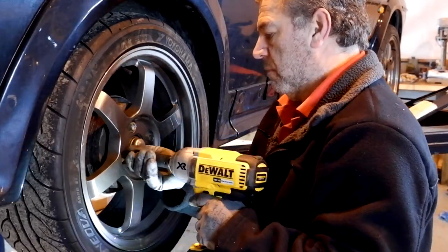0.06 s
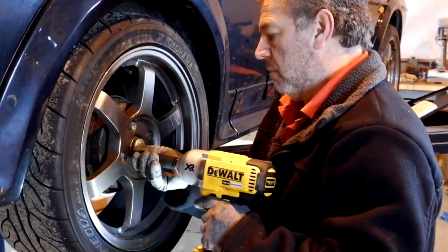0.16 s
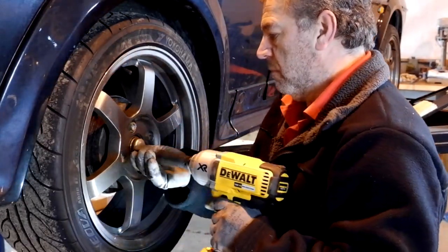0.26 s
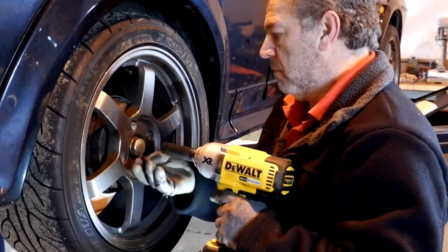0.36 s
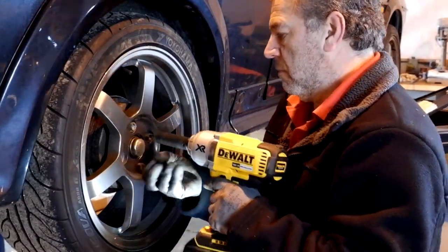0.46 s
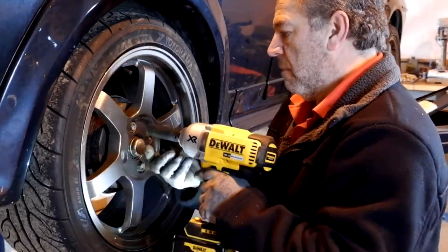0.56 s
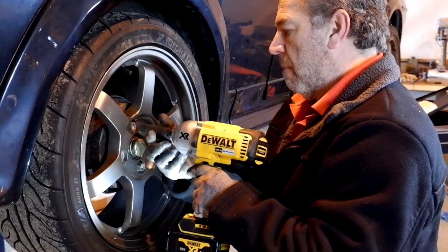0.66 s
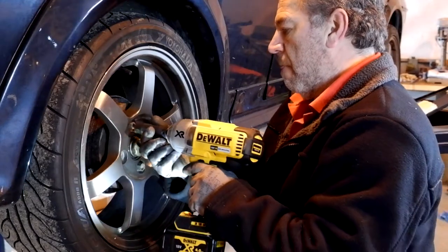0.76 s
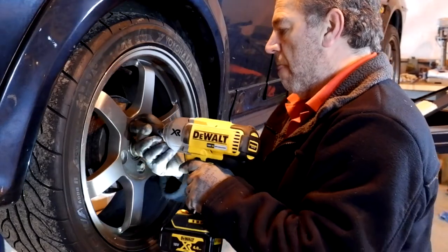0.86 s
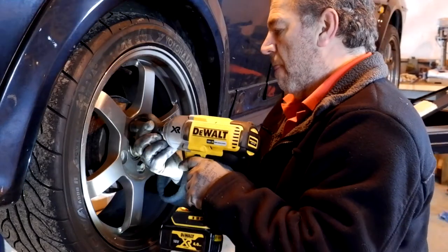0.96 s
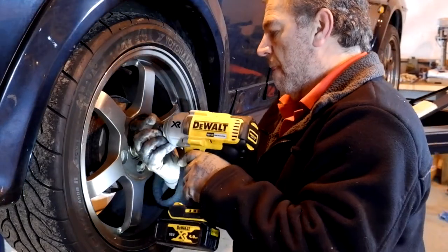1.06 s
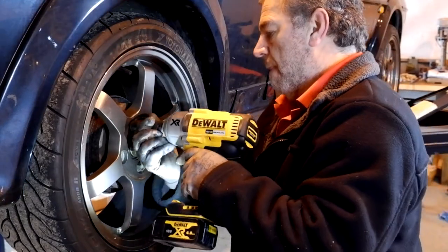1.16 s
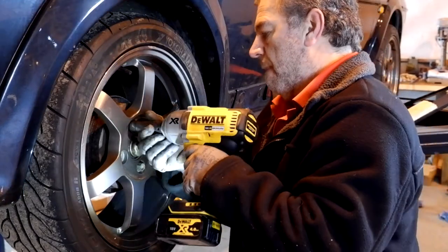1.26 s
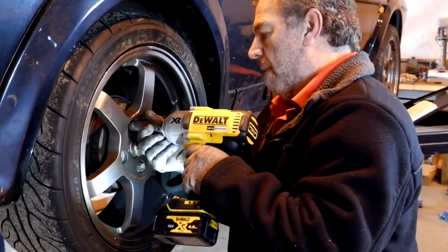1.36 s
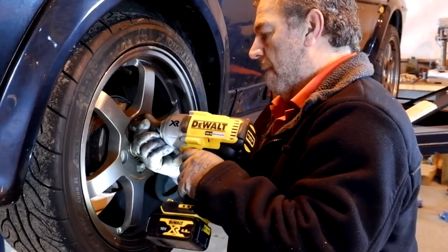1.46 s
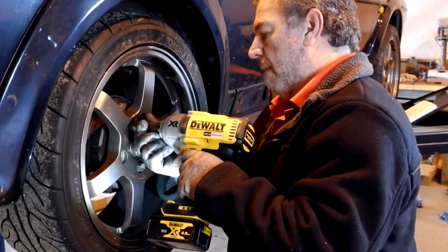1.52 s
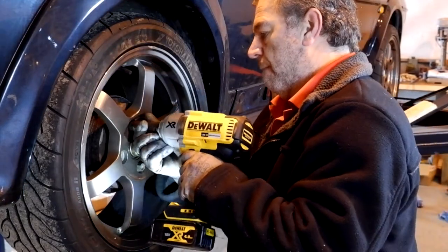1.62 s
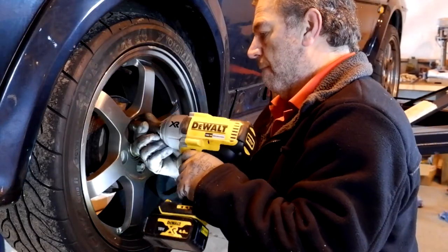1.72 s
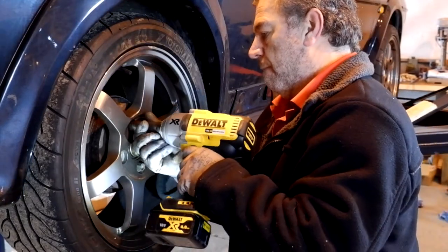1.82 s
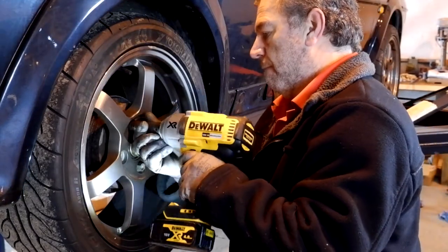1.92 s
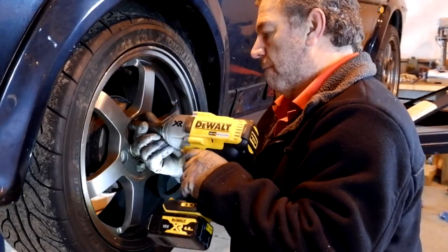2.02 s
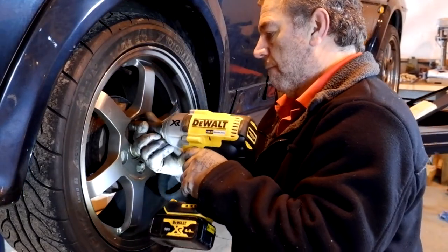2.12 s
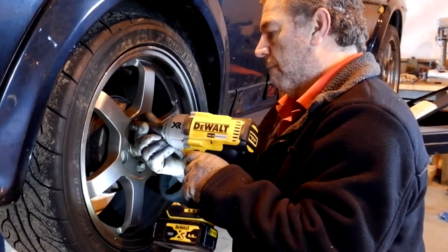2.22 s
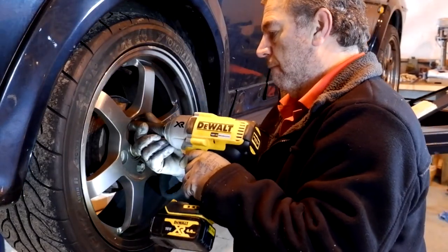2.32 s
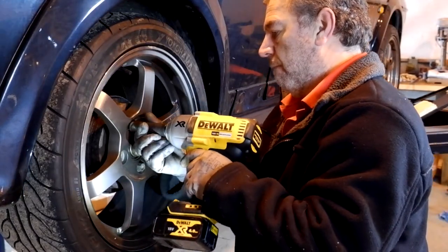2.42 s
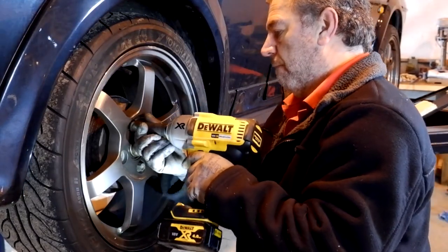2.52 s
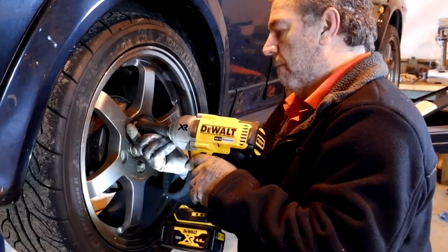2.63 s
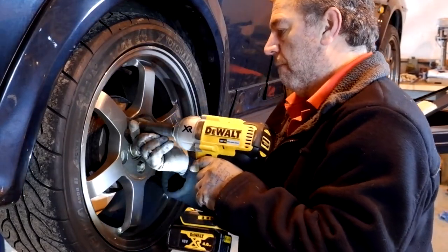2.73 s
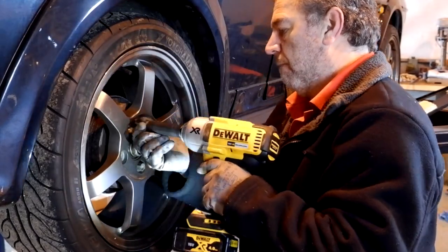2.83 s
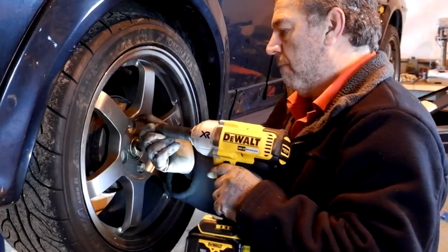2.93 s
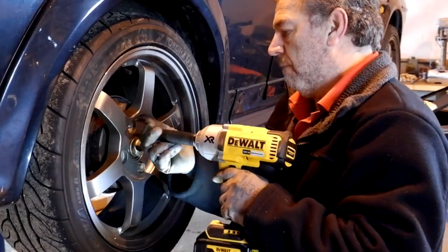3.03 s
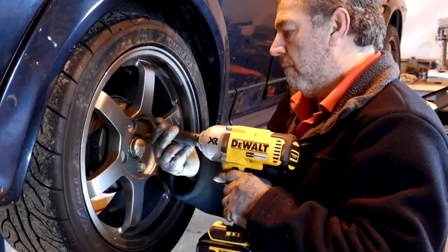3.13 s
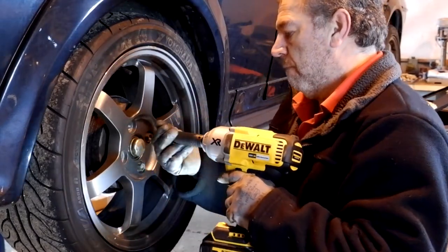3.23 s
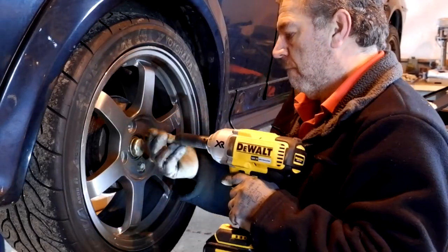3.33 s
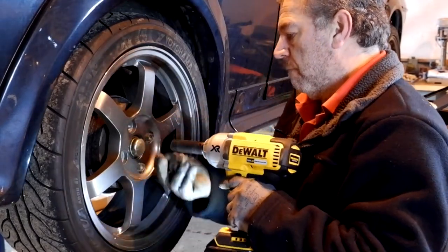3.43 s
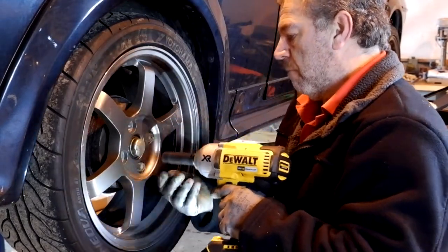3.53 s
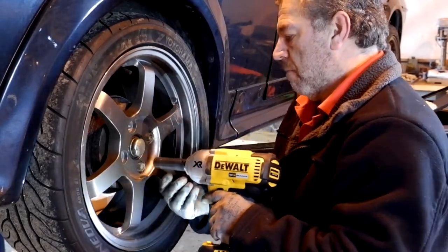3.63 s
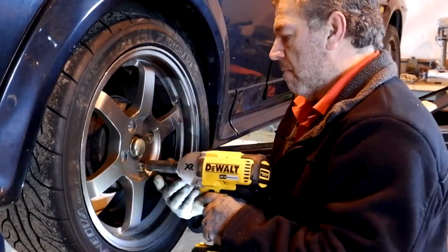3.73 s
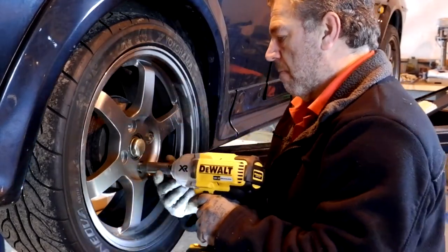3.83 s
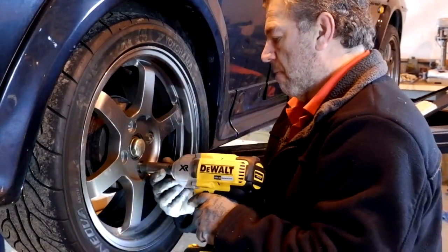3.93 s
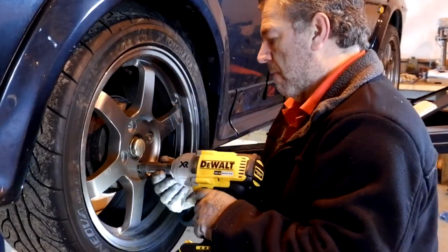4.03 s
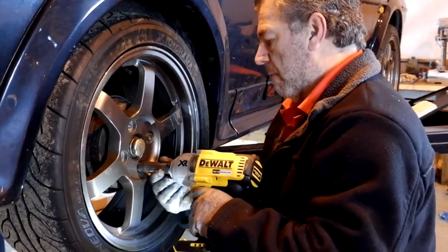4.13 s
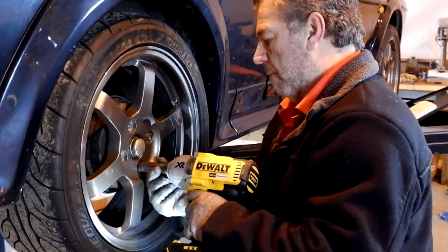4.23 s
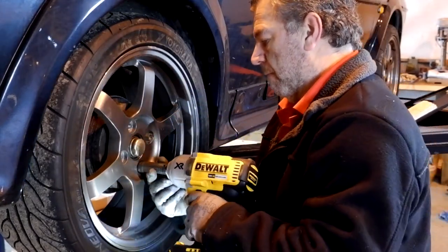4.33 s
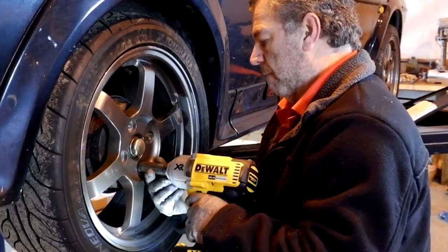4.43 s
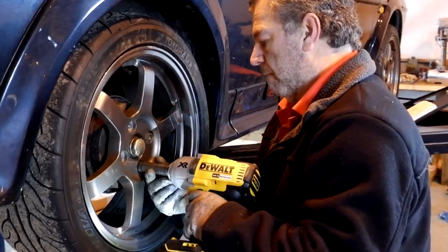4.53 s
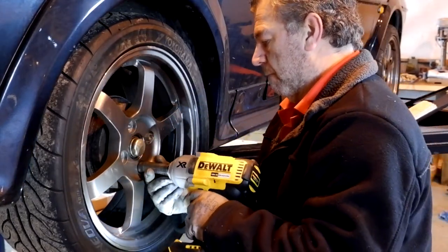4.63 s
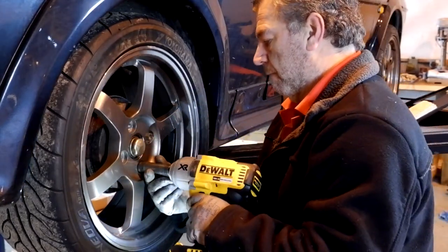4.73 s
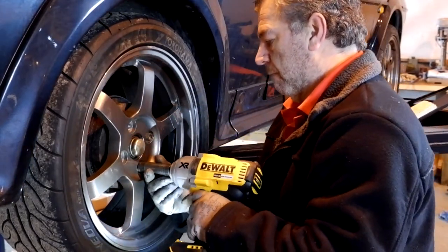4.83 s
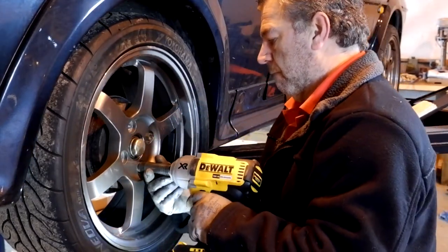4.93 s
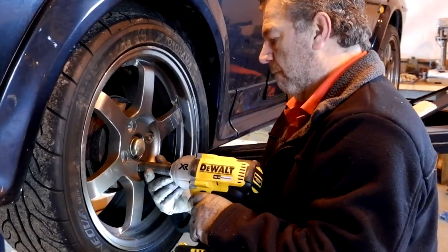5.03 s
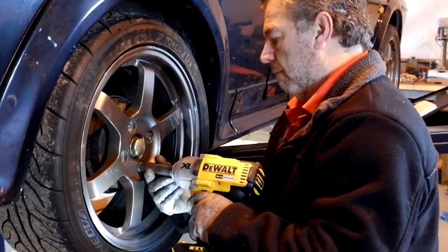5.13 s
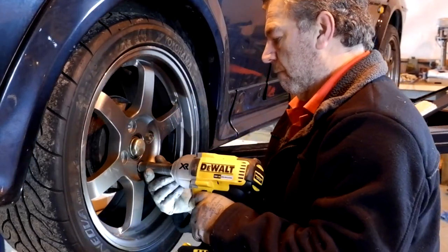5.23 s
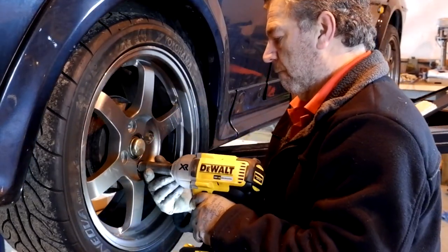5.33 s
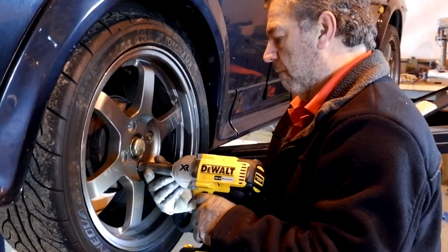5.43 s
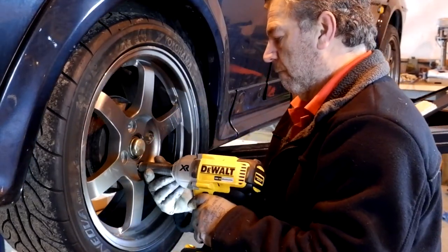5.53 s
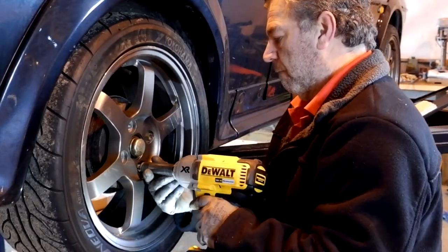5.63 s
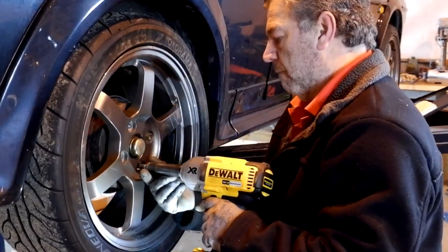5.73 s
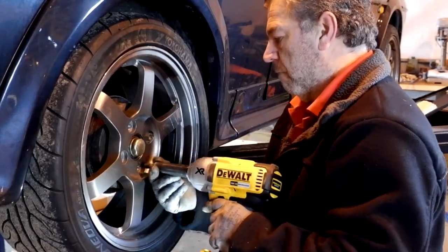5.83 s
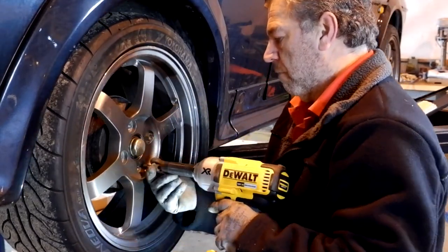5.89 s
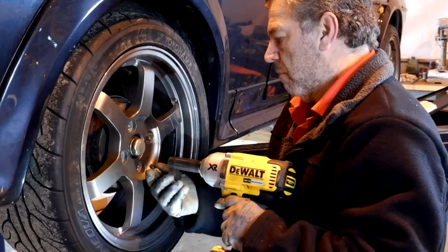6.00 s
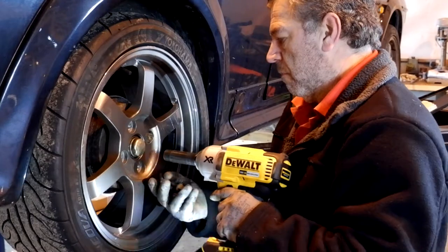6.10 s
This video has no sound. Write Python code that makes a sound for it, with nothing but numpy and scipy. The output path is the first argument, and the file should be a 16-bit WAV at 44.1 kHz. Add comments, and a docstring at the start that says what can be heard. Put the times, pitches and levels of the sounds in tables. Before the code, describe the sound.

A cordless impact wrench is heard close and central in a large, echoing garage with a soft low hum. At 0 s a motor run winds down with a falling squeal, stopping by 0.16, followed by small clinks and faint glove brushes. A solid socket knock lands at 1.0, lighter ticks around 1.35, and a heavy clank at 1.55. From 1.78 to 1.97 the motor strains and the hammer strikes hard, uneven metallic blows; three more come near 2.19. From 2.4 the motor whines up, peaks around 2.65 and sinks until 3.2, gears rattling. Little clinks follow, with firmer knocks at 3.97 and 4.32 and a sleeve brush. A second dense hammer burst hits at 4.55-4.7, ringing in the wheel and hall. Two lower, shorter whirs run at 4.9-5.1 and 5.15-5.7, with a brief squeal. Light knocks and a brush close by 6.1.

```python
"""A large garage: a cordless impact wrench works close by in the middle, hall and low hum around the microphone.
It opens on the motor running down, then socket and bolt knock and a glove or sleeve brushes.
The hammer strikes uneven blows, the motor whines and the gears rattle while a bolt spins out;
more knocks, a second burst of blows and two shorter runs follow, and a few knocks close the scene.
Struck modes ring in the alloy wheel, decaying noise rings in the hall, and filtered noise makes the hum."""
import sys
import numpy as np
from scipy import signal
from scipy.fft import rfft, irfft
from scipy.io import wavfile
from scipy.ndimage import uniform_filter1d, minimum_filter1d

SR = 44100
rng = np.random.default_rng(int(sys.argv[2]) if len(sys.argv) > 2 else 0)


def voltage_ratio(decibels):
    """Convert decibels (scalar or array-like) to amplitude ratios, 20 dB per decade."""
    exponent = np.asarray(decibels, float) / 20
    return 10 ** exponent


def wrap_up_sound(samples):
    """Save the sound to the file named by the first command line argument, as 16-bit audio."""
    columns = np.atleast_2d(samples).T
    # keep every value between -1 and 1, then stretch to whole-number steps
    tamed = np.clip(columns, -1, 1)
    steps = np.round(tamed * 32767).astype(np.int16)
    wavfile.write(sys.argv[1], SR, steps)


N = 271656


def in_time(tables, rest):
    """Columns of several spans on the sample clock, at their rest value in between."""
    t, out = np.arange(N) / SR, None
    for rows in tables:
        s, *columns = np.transpose(rows)
        if out is None:
            out = np.full((len(columns), N), rest, float)
        inside = (t >= s[0]) & (t <= s[-1])
        out[:, inside] = [np.interp(t[inside], s, c) for c in columns]
    return out


def soft_gain(db):
    """Gain with edges rounded over a few milliseconds."""
    return uniform_filter1d(voltage_ratio(db), size=200)


def rms_one(x):
    """Scale to rms 1."""
    return x / np.sqrt(np.mean(x ** 2) + 1e-20)


def at_hz(hz, points, column):
    """Read a table along log frequency."""
    points = np.array(points)
    return np.interp(np.log(np.maximum(hz, 1)), np.log(points[:, 0]), points[:, column])


def coloured(x, spectrum):
    """Shape by a (f/Hz, level/dB) spectrum."""
    hz = np.arange(N // 2 + 1) * SR / N
    return irfft(rfft(x) * voltage_ratio(at_hz(hz, spectrum, column=1)), N)


def filtered(x, order, edges_hz, kind):
    """Butterworth filter."""
    return signal.sosfilt(signal.butter(order, edges_hz, kind, fs=SR, output="sos"), x)


def drift(rate):
    """Slow chance of spread 1, wandering below about rate in Hz."""
    r = np.exp(-2 * np.pi * rate / SR)
    return rms_one(signal.lfilter([1], [1, -2 * r, r * r], rng.standard_normal(N + SR))[SR:])


def ring(clicks, hz, t60):
    """A unit click sets a decaying sine ringing that falls 60 dB in t60 seconds."""
    r, w = voltage_ratio(-60 / (t60 * SR)), 2 * np.pi * hz / SR
    return signal.lfilter([0, np.sin(w)], [1, -2 * r * np.cos(w), r * r], clicks + 1e-18)


# spectrum of the garage hum: f/Hz, relative level/dB per Hz
HUM_SPECTRUM = [(15, -47), (25, -10.5), (96, -1.5), (297, 0), (433, -2), (496, 0.5), (703, -1), (826, 8),
                (1760, -9), (2060, -7.5), (5010, -14.5), (8140, -20.5), (15500, -21.5)]
# gain of the hum's bass, turned down around loud tool sounds and let back: t/s, level/dB
HUM_BASS_LEVEL = [(0, -25), (.5, 7), (1.8, 9.5), (2.1, -10), (3.2, -11), (3.6, 4), (4.5, 14), (4.9, -7),
                  (5.7, 0), (6.16, 5.5)]


def hum():
    """Two independent steady noises all around; a table turns their bass down around loud tool sounds."""
    noise = np.array([rms_one(coloured(rng.standard_normal(N), HUM_SPECTRUM)) for _ in range(2)])
    low = signal.sosfiltfilt(signal.butter(2, 300, fs=SR, output="sos"), noise)
    bass_gain = voltage_ratio(in_time([HUM_BASS_LEVEL], rest=0)[0])
    return voltage_ratio(-48.5) * (noise - low + bass_gain * low)


def pulled(rows, column, lag=0):
    """Level in dB: each pull rises, then drifts up or down in level or stays level until it is braked."""
    rise_db, stop_s = 17.5, 0.01
    spans = []
    for row in rows:
        start, rise, end, level_change, level = row[0] + lag, row[1], row[2], row[5], row[column]
        spans.append([(start, level - rise_db), (start + rise, level),
                      (end, level + level_change), (end + stop_s, level + level_change - rise_db)])
    return in_time(spans, rest=-120)[0]


# trigger pulls with the bolt turning:
# start t/s, rise t/s, end t/s, whine level/dB, gear rattle level/dB, level change by the end/dB
FREE_PULLS = [(-.1, .05, .155, -28, -40, -1), (2.385, .16, 3.2, -37, -37, 1.5),
              (4.89, .08, 5.095, -40, -42, -9), (5.16, .06, 5.68, -38, -40, 0)]
# trigger pulls against the stuck bolt:
# start t/s, rise t/s, end t/s, whine level/dB, housing rumble level/dB, level change by the end/dB
STUCK_PULLS = [(1.775, 0.028, 1.885, -24.5, -23.5, -3), (2.11, .06, 2.19, -33.5, -35, 12),
               (4.535, 0.027, 4.65, -20, -20.5, -10.5)]


def trigger_levels():
    """Whine, free-running and strained levels in dB: whine leads the gears, strain follows the trigger."""
    whine_lead_s, strain_lag_s = 0.04, 0.036
    whine_db = np.maximum(pulled(FREE_PULLS, column=3, lag=-whine_lead_s), pulled(STUCK_PULLS, column=3))
    free_db = pulled(FREE_PULLS, column=4)
    strain_db = pulled(STUCK_PULLS, column=4, lag=strain_lag_s)
    return whine_db, free_db, strain_db


# rotor speed, one list for each free run: t/s, rotor turns per s
ROTOR_RUNS = [
    [(-.1, 300), (0, 250), (.125, 140), (.15, 130)],
    [(2.41, 165), (2.46, 265), (2.52, 340), (2.58, 400), (2.66, 412), (2.75, 397), (2.9, 335), (3.07, 243),
     (3.2, 200)],
    [(4.91, 175), (4.95, 244), (4.975, 266), (5.0, 244), (5.04, 175), (5.06, 160)],
    [(5.19, 145), (5.24, 209), (5.275, 224), (5.37, 210), (5.44, 185), (5.52, 167), (5.68, 140)],
]


def rotor():
    """Smoothed rotor speed in turns per s, its angle in radians, and a soft gate open while it spins."""
    turns = in_time(ROTOR_RUNS, rest=0)[0]
    spinning = uniform_filter1d(minimum_filter1d(1.0 * (turns > 0), size=900), size=900)
    turns = uniform_filter1d(turns, size=700)
    return turns, 2 * np.pi * np.cumsum(turns) / SR, spinning


# resonances that the motor whine sits in: f/Hz, width/Hz, relative level/dB
WHINE_RESONANCES = [(3260, 150, -6.5), (3404, 100, 2), (3607, 69, 3), (3570, 220, -2.5)]


def whine():
    """Noise ringing in narrow resonances, each wavering in level."""
    total = 0
    for hz, width, level_db in WHINE_RESONANCES:
        tone = rms_one(ring(rng.standard_normal(N), hz, 2.2 / width))   # width to t60
        total = total + voltage_ratio(level_db + 4.0 * drift(30)) * tone
    return rms_one(total)


# spectrum of the gear rattle: f/Hz, relative level/dB per Hz
RATTLE_SPECTRUM = [(2290, -65), (3900, -3), (4230, -7), (4800, 0.5), (5580, -2.5), (8410, -14.5),
                   (11700, -20), (13900, -24), (15500, -29)]


def gear_rattle(turns, angle):
    """Grainy noise that throbs once per spindle turn, deeper at higher rotor speed."""
    gear_ratio, throb_phase = 20.6, 2.15   # rotor turns per spindle turn, radians
    throb = 3.5 * (turns / 400) ** 2 * np.sin(angle / gear_ratio + throb_phase)   # dB
    grains = rng.standard_normal(N) * voltage_ratio(1.9 * drift(125) + throb)
    return rms_one(coloured(grains, RATTLE_SPECTRUM))


# spectrum of the housing rumble: f/Hz, relative level/dB per Hz
RUMBLE_SPECTRUM = [(150, -42), (250, -20.5), (720, -13), (817, -4.5), (1910, -2.5), (2830, -1), (3400, 8),
                   (3900, -16.5), (5070, -71), (8580, -120)]


def housing_rumble():
    """Shaped noise with a slowly wavering level."""
    return rms_one(coloured(rng.standard_normal(N) * voltage_ratio(1.5 * drift(30)), RUMBLE_SPECTRUM))


def wheel_groan():
    """The strained wheel groans: noise in one broad low resonance."""
    return rms_one(ring(rng.standard_normal(N), 357, 1.5 / 320))   # Hz, t60 from a width in Hz


def housing(hz):
    """Gain of the housing: a resonance lifts tones near it, and low tones radiate poorly."""
    resonance_hz, width_hz, boost_db, radiates_above_hz = 3330, 170, 17, 480
    resonance = voltage_ratio(boost_db * np.exp(-((hz - resonance_hz) / width_hz) ** 2))
    return resonance / (1 + (radiates_above_hz / (hz + 1)) ** 4)


# rotor tones: multiple of the rotor speed, relative level/dB
ROTOR_ORDERS = [(2, -1.5), (3, 0), (4, -6), (5, -9), (6, 1), (7, -8), (12, -6), (14, 1)]


def rotor_tones(turns, angle):
    """Sines at multiples of the rotor speed, wavering in level and phase, through the housing."""
    total = 0
    for k, level_db in ROTOR_ORDERS:
        tone = np.sin(k * angle + .42 * drift(40))
        total = total + voltage_ratio(level_db + 4.0 * drift(15)) * housing(k * turns) * tone
    return total


def swelling_tone(turns, angle):
    """One more rotor tone that swells and fades early in each run."""
    order, level_db, peak_s, width_s = 9, -38.5, .065, .06
    t = np.arange(N) / SR
    swell = sum(np.exp(-((t - run[0][0] - peak_s) / width_s) ** 2) for run in ROTOR_RUNS)
    tone = np.sin(order * angle + .4 * drift(50))
    return voltage_ratio(level_db + 2.5 * drift(40)) * swell * housing(order * turns) * tone


def motor():
    """Whine, gear rattle, housing rumble, groan and rotor tones follow the trigger."""
    whine_db, free_db, strain_db = trigger_levels()
    turns, angle, spinning = rotor()
    rattle_db = np.maximum(free_db, strain_db - 13)
    rumble_db = np.maximum(free_db, strain_db)
    noise = soft_gain(whine_db) * whine()
    noise += soft_gain(rattle_db) * gear_rattle(turns, angle)
    noise += soft_gain(rumble_db) * housing_rumble()
    noise += soft_gain(strain_db - 7.5) * wheel_groan()
    tones = soft_gain(free_db - 10) * rotor_tones(turns, angle) + swelling_tone(turns, angle)
    return noise + spinning * tones


# wheel and hall ringing on: f/Hz, t60/s, relative level/dB
HALL_DECAY = [(60, 1.4, -19), (200, 0.8, -8.5), (646, 1.24, -7), (1500, 0.71, -11.5), (2850, 1.24, -12.5),
              (3270, 1.83, -8.5), (3960, 1.04, -19.5), (8100, 1.33, -25), (15000, .2, -52)]


def hall(x):
    """Two tails of noise that die band by band: the first is heard in the middle, the second at the sides."""
    t = np.arange(int(1.6 * SR)) / SR
    edges = 50 * 2 ** np.arange(0, 8.4, 1 / 3)   # third-octave bands, Hz
    tails, white = 0, rng.standard_normal((2, 2, len(t)))
    for k, (low, high) in enumerate(zip(edges, edges[1:])):
        band = filtered(white[k % 2], 2, [low, high], "band")   # neighbours use different noise
        hz = np.sqrt(low * high)
        level_db, t60 = at_hz(hz, HALL_DECAY, column=2) - 30.5, at_hz(hz, HALL_DECAY, column=1)
        tails = tails + band * voltage_ratio(level_db - 60 * t / t60)
    build_up = 1 - np.exp(-t / 0.0013)
    return signal.fftconvolve(x[None], tails * build_up, axes=1)[:, :N]


# brief squeals of the turning bolt: t/s, f/Hz, glide/Hz per s, level/dB, half-length/s
BOLT_SQUEALS = [(.052, 3530, -12000, -21, .013), (3.18, 3600, 0, -32, .025), (5.225, 3600, 4000, -27, .018),
                (5.485, 2720, 0, -43, .012), (5.605, 5420, 0, -38, .015)]


def squeals():
    """Short tones, some of them gliding."""
    t, out = np.arange(N) / SR, 0
    for s, hz, glide, level_db, length in BOLT_SQUEALS:
        after = t - s
        tone = np.sin(2 * np.pi * (hz + glide * after / 2) * after)
        out = out + voltage_ratio(level_db) * np.exp(-(after / length) ** 2) * tone
    return out


# what the anvil and socket ring with: f/Hz, relative level/dB, t60/s
ANVIL_MODES = [(1760, -27, 0.018), (2100, -13.5, 0.028), (3196, 12, 0.0039), (3500, -1.5, 0.019),
               (4390, -1.5, 0.0068), (4910, -2.5, 0.0047), (6200, -14, 0.017)]
# what the wheel and the car ring with when struck: f/Hz, relative level/dB, t60/s
WHEEL_MODES = [(102.6, -34, 0.82), (145.3, -20, 0.43), (192.5, -11, 0.22), (260.5, -8, 0.12),
               (305, 0, 0.029), (368, 5, 0.085), (507, -4.5, 0.15), (572.5, 7.5, 0.15), (744, 7.5, 0.063),
               (862, 11.5, 0.059), (1205, 10.5, 0.032)]


def contacts(rows, crack_db, thud_db, treble_db, spread_db, boom_db, chatter_s):
    """Each contact chatters for a moment into the anvil, pushes the wheel and spits a short treble burst.
    Returns the sound toward the microphone and the sound spread to all sides, where single modes blur."""
    rows, t = np.array(rows), np.arange(1200) / SR
    peak_s, crack_level, thud_level, treble_level = rows.T
    # a square contact pushes the wheel hard and chatters longer than a glancing one
    length = chatter_s * (1 + 2.0 * np.minimum(voltage_ratio(thud_level - crack_level), 1))
    at = ((peak_s - length) * SR).astype(int)
    chatter = rng.standard_normal((len(rows), len(t))) * t * np.exp(-t / length[:, None])

    crack = 0
    for hz, level_db, t60 in ANVIL_MODES:
        chance_db = 2 * rng.standard_normal((len(rows), 1))
        crack = crack + voltage_ratio(level_db + chance_db) * ring(chatter, hz, t60)
    crack = filtered(crack, 4, 6500, "low")
    spit = filtered(chatter, 2, [6500, 13000], "band")
    crack *= voltage_ratio(crack_level + crack_db)[:, None] / np.abs(crack).max(axis=1, keepdims=True)
    spit *= voltage_ratio(treble_level + treble_db)[:, None] / np.abs(spit).max(axis=1, keepdims=True)
    samples = at[:, None] + np.arange(len(t))
    near = np.bincount(samples.ravel(), (crack + spit).ravel(), N)[:N]

    clicks, pushes = np.zeros(N), np.zeros(N)
    clicks[at], pushes[at] = voltage_ratio(crack_level + spread_db), voltage_ratio(thud_level + boom_db)
    spread = filtered(clicks, 2, [1300, 5000], "band") + filtered(pushes, 1, [120, 1100], "band")

    thud = 0
    for k, (hz, level_db, t60) in enumerate(WHEEL_MODES):
        push, chance_db = np.zeros(N), 2 * rng.standard_normal(len(rows))
        push[at] = voltage_ratio(thud_level + thud_db + level_db + chance_db) * (-1) ** k
        thud = thud + ring(push, hz, t60)
    soft = np.exp(-1 / (0.0005 * SR))   # the heavy wheel takes the push up slowly
    thud = signal.lfilter([1 - soft], [1, -soft], thud)
    return np.array([near + thud, spread + voltage_ratio(-10) * thud])


# socket and bolt touching the wheel: t/s, then relative level/dB of crack, of wheel thud, of treble
SOCKET_KNOCKS = [(0.155, -24, -45, -32), (0.2067, -22.8, -40.6, -36.2), (0.2382, -27.1, -46.7, -43.1),
                 (0.3616, -34.8, -42.4, -54.6), (0.9994, -9.8, -11.9, -26.2), (1.3236, -19.5, -36.5, -34.7),
                 (1.355, -31.5, -54.0, -53.1), (1.368, -16.9, -28.7, -44.9), (1.4292, -36.4, -36.2, -55.4),
                 (1.546, -2.2, -1.2, -22.8), (3.1937, -22.8, -40.5, -37.8), (3.2535, -28.3, -42.7, -42.2),
                 (3.2824, -26.7, -41.3, -38.0), (3.3209, -31.3, -61.3, -45.9),
                 (3.3405, -30.9, -43.4, -49.6), (3.5502, -26.0, -46.4, -52.8),
                 (3.7051, -36.0, -39.7, -48.9), (3.9725, -7.0, -8.8, -24.1), (4.1146, -19.9, -21.1, -51.6),
                 (4.1199, -16.7, -21.2, -48.2), (4.2838, -27.2, -45.8, -53.6), (4.289, -25.8, -48.7, -52.9),
                 (4.3178, -6.8, -4.3, -22.3), (4.542, -24, -45, -50), (5.6811, -16.1, -37.3, -30.9),
                 (5.7308, -21.1, -41.4, -38.6), (5.7614, -21.5, -42.4, -40.7),
                 (5.8819, -26.7, -43.5, -39.7), (6.1127, -31.8, -40.7, -52.8)]


def knocks():
    """Socket and bolt touch the wheel, with a strong boom toward the hall."""
    return contacts(SOCKET_KNOCKS, crack_db=1.0, thud_db=-10.0, treble_db=-2.0,
                    spread_db=14.5, boom_db=30.5, chatter_s=0.000612)


# soft brushes of glove and sleeve: t/s, relative level/dB, half-length/s
SLEEVE_BRUSHES = [(0.498, -54, 0.03), (0.845, -54.5, 0.019), (3.712, -52, 0.015), (4.301, -44.5, 0.017),
                  (6.029, -50.5, 0.028)]


def brushes():
    """Short smooth swells of bright noise."""
    t = np.arange(N) / SR
    swell = sum(voltage_ratio(level_db) * np.exp(-((t - s) / length) ** 2) for s, level_db, length in SLEEVE_BRUSHES)
    return swell * rms_one(filtered(rng.standard_normal(N), 1, [1200, 7000], "band"))


# hammer on anvil: t/s, then relative level/dB of crack, of wheel thud, of treble
HAMMER_BLOWS = [(1.7888, -19.7, -26.3, -50.5), (1.7978, -2.1, -42.4, -18.3), (1.8391, -1.0, -21.5, -17.3),
                (1.851, -8.8, -20.7, -32.8), (1.8711, 1.5, -10.7, -6.7), (1.8953, -3.9, -41.6, -23.2),
                (1.9014, -3.0, -24.7, -9.9), (1.9098, -3.0, -22.8, -15.7), (1.9568, -9.3, -31.7, -25.4),
                (1.9647, -6.6, -26.9, -14.9), (1.9701, -14.4, -32.1, -19.2), (2.1831, -13.9, -37.1, -29.1),
                (2.1923, -3.0, -17.0, -16.8), (2.2008, -3.5, -36.9, -15.7), (4.5708, -4.8, -14.1, -11.1),
                (4.5751, -8.5, -11.6, -30.1), (4.6071, -1.7, -20.9, -14.0), (4.6258, 0.4, -14.2, -14.5),
                (4.6374, 2.2, -13.0, -6.0), (4.6682, -2.6, -23.5, -20.9), (4.6737, -4.3, -21.6, -10.1),
                (4.6814, -6.4, -14.7, -19.9)]


def blows():
    """The hammer strikes the anvil in uneven bursts."""
    return contacts(HAMMER_BLOWS, crack_db=0.67, thud_db=-13.5, treble_db=0.1,
                    spread_db=16.5, boom_db=12.5, chatter_s=.0006)


# spectrum shaping the sides: f/Hz, relative level/dB
SIDE_SPECTRUM = [(60, -37), (110, -38), (200, -39.5), (380, -34), (700, -41), (1290, -35.5), (2380, -28),
                 (4400, -28), (8120, -21), (15000, -22)]


def scene():
    """Tool close in the middle, hall and hum around the microphone."""
    background = hum()
    tool = motor() + squeals() + knocks() + brushes() + blows()
    near, spread = filtered(tool, 4, 95, "high")   # the tool is heard without its deepest bass, below about 95 Hz
    wet = hall(spread)
    mid = near + wet[0] + background[0]
    side = voltage_ratio(1.5) * np.roll(near, 7) + voltage_ratio(2.0) * wet[1] + voltage_ratio(19.5) * background[1]
    side = coloured(side, SIDE_SPECTRUM)
    return np.array([mid + side, mid - side])


def roll_off(x):
    """The treble ends steeply here."""
    return signal.sosfilt(signal.butter(12, 15670, fs=SR, output="sos"), x)


def record(dry):
    """The loudest blows are rounded at full scale."""
    mix = 1.096 * np.tanh(dry / 1.088)
    return roll_off(mix)


dry = scene()
out = record(dry)
wrap_up_sound(out)
```